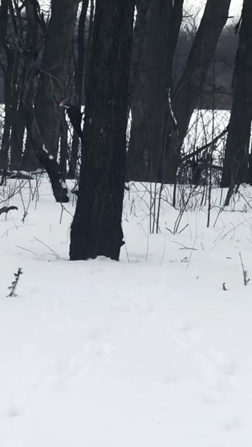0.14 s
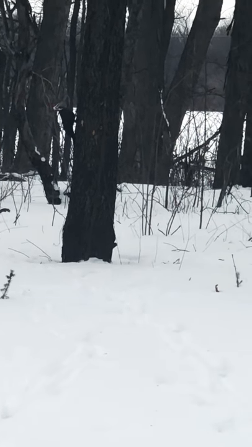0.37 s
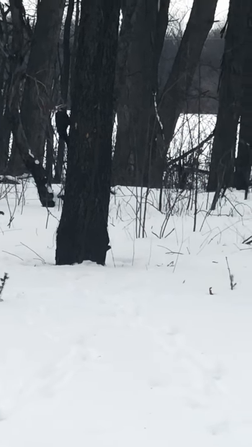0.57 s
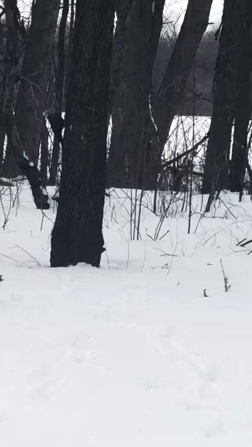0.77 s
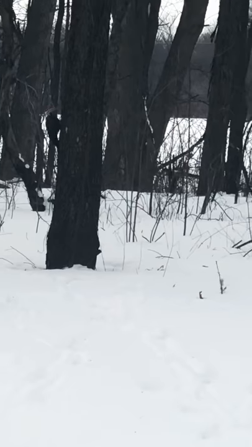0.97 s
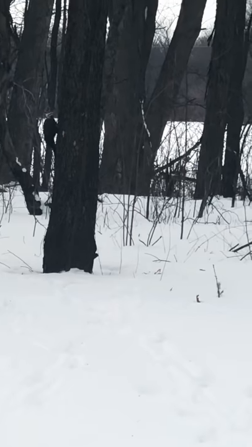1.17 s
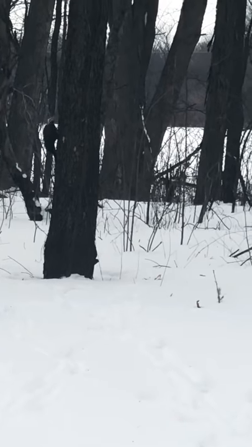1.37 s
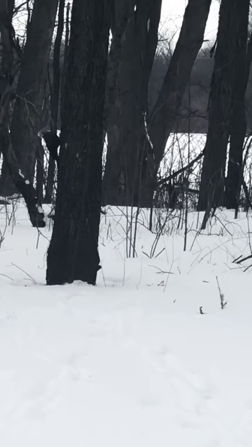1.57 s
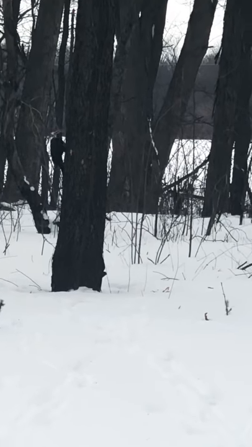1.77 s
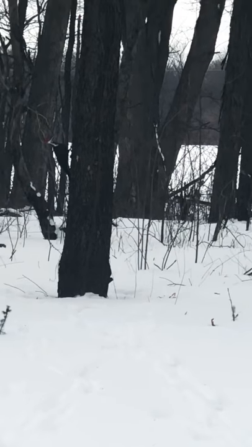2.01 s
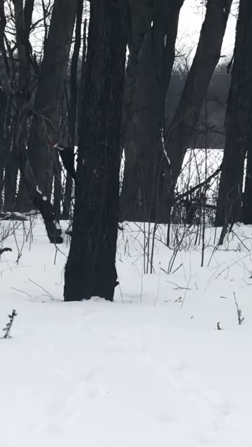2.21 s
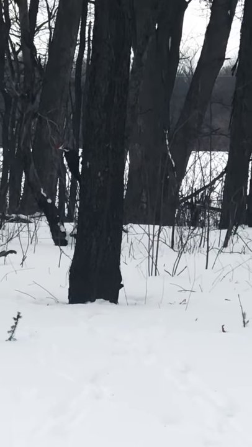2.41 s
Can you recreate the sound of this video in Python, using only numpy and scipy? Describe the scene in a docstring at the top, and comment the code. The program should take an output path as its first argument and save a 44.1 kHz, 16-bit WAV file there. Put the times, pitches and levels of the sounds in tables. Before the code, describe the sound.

A woodpecker knocks slowly on a tree trunk, five spaced hollow taps in quiet snowy woods

```python
"""Woodpecker in a snowy wood

In a quiet wood a woodpecker knocks five times on a trunk: noise clicks over damped modes, with ticks of bark.
A small bird gives two thin, arched chirps, sines with an octave, that hang among the trees as scattered echoes.
Soft bumps of sinking pitch sound close to the microphone, some with a dull, ringing contact.
Behind lie a far rumble with deep sine throbs, a faint hiss and a wavering whir, all of filtered noise."""
import sys
import numpy as np
from scipy import signal
from scipy.fft import rfft, irfft
from scipy.io import wavfile
from scipy.ndimage import uniform_filter1d

SR = 44100
rng = np.random.default_rng(int(sys.argv[2]) if len(sys.argv) > 2 else 0)


def generate_wav(signal):
    """Clip the signal to [-1, 1] and save it as 16-bit WAV at the path in sys.argv[1]."""
    frames = np.transpose(np.atleast_2d(signal))
    scaled = np.clip(frames, -1, 1) * 32767
    pcm = np.round(scaled).astype(np.int16)
    wavfile.write(sys.argv[1], SR, pcm)


N = 108045  # length in samples


def amp(db):
    """Decibels to gain."""
    return 10 ** (np.asarray(db) / 20)


def unit(x):
    """Scales to rms 1."""
    return x / np.sqrt(np.mean(x ** 2) + 1e-20)


def read(points, hz):
    """Reads a table of values against frequency on a log-frequency axis."""
    freq_hz, value = np.transpose(points)
    return np.interp(np.log(hz + 1), np.log(freq_hz + 1), value)


def add(mix, start_s, sound):
    """Mixes a sound in at its start time."""
    part = mix[max(round(start_s * SR), 0):][:len(sound)]
    part += sound[:len(part)]


def drift(n, size):
    """Smooth random wander of rms 1; size is the smoothing in samples."""
    once = uniform_filter1d(rng.standard_normal(n), size)
    return unit(uniform_filter1d(once, size))


def burst(spectrum, t60_s):
    """A short crack: dying noise coloured by a causal filter, so that nothing sounds ahead of it."""
    t = np.arange(4096) / SR
    hz = abs(np.fft.fftfreq(len(t), 1 / SR))
    log_gain = np.log(amp(read(spectrum, hz)))
    # minimum phase, found from the log gain
    response = np.exp(np.conj(signal.hilbert(log_gain)))
    colour = np.fft.ifft(response).real[:1024]
    fade = amp(-60 * t / t60_s)
    crack = signal.fftconvolve(rng.standard_normal(len(t)) * fade, colour)[:len(t)]
    return unit(crack) * np.sqrt(np.mean(fade ** 2))


def air(spectrum, patch_db, size):
    """Coloured noise whose level drifts in patches of time and frequency."""
    hz = np.fft.rfftfreq(size, 1 / SR)
    real, imag, rough = rng.standard_normal((4 * N // size + 6, len(hz), 3)).T
    patches = uniform_filter1d(rough, size=7, axis=0)
    patches = unit(uniform_filter1d(patches, size=5, axis=1))
    z = (real + 1j * imag) * amp(read(spectrum, hz)[:, None] + patch_db * patches)
    noise = signal.istft(z, nperseg=size, noverlap=size - size // 4)[1]
    return unit(noise[:N])


def ring(modes, rise_s, tuning=1):
    """Damped modes; neighbours swing in opposite directions, so the knock swells over a cycle or two."""
    t = np.arange(4096) / SR
    swings = np.zeros(len(t))
    for k, (hz, db, t60_s) in enumerate(modes):
        swings += (-1) ** k * amp(db - 60 * t / t60_s) * np.sin(2 * np.pi * tuning * hz * t)
    return (1 - np.exp(-t / rise_s)) ** 2 * swings


# far rumble, relative spectrum: freq_hz, density_db
RUMBLE_SPECTRUM = [(20, -56), (34, -34), (48, -13), (66, 2), (82, 0.5), (100, -7), (170, -5), (250, -12.5),
                   (400, -15.5), (600, -23.5), (950, -28), (1170, -28), (1380, -31), (1900, -34),
                   (2800, -47), (8000, -70)]
# slow course of the rumble: time_s, level_db
RUMBLE_SWELL = [(0, -1), (.2, 1), (.55, -1), (.8, 1), (1.05, 2), (1.3, 1), (1.7, 0.5), (1.95, 1.5),
                (2.17, 1.5), (2.45, 0.5)]
# faint hiss, relative spectrum: freq_hz, density_db
HISS_SPECTRUM = [(20, 6), (2000, 3), (3500, 3), (5000, 0), (8250, -2.5), (8700, 2), (9150, -4), (12500, -4),
                 (14000, -6), (16000, -12.5)]
RUMBLE_DB, RUMBLE_PATCH_DB = -53.5, 2.5
HISS_DB, HISS_PATCH_DB = -74, 1
WHIR_HZ, WHIR_WIDTH_HZ, WHIR_DB, WHIR_WAVER_DB = 1596, 182, -71.5, 1.5


def background():
    """Far rumble, even hiss and a faint wavering whir: noise through broad spectra and one narrow band."""
    swell = amp(np.interp(np.arange(N) / SR, *np.transpose(RUMBLE_SWELL)))
    rumble = amp(RUMBLE_DB) * swell * air(RUMBLE_SPECTRUM, RUMBLE_PATCH_DB, size=4096)
    hiss = amp(HISS_DB) * air(HISS_SPECTRUM, HISS_PATCH_DB, size=512)
    hz = np.fft.rfftfreq(N, 1 / SR)
    band = 1 / (1 + ((hz - WHIR_HZ) / (WHIR_WIDTH_HZ / 2)) ** 2)
    whir = unit(irfft(rfft(rng.standard_normal(N)) * band, N))
    whir *= amp(WHIR_DB + WHIR_WAVER_DB * drift(N, size=3000))
    return rumble + hiss + whir


# low bumps close to the microphone: start_s, level_db, start_pitch_hz, length_s, rise_s
CLOSE_BUMPS = [(0.2261, -30.1, 223, 0.035, 0.0036), (0.249, -15.5, 270, 0.024, 0.02),
               (.269, -25, 403, 0.04, 0.0023), (0.3108, -27, 630, 0.038, 0.014),
               (0.8703, -27.5, 495, 0.023, 0.015), (0.9305, -19.5, 600, 0.031, 0.016),
               (1.372, -42.5, 327, 0.016, 0.0033), (1.678, -36.5, 390, 0.033, .008),
               (2.099, -38.5, 390, .04, 0.0069)]
# dull contact at the harder bumps: start_s, level_db
BUMP_CONTACTS = [(0.2693, -35.5), (.3150, -32), (0.9307, -21.5)]
# what the contact rings with: pitch_hz, level_db, t60_s
CONTACT_MODES = [(368, -9.5, 0.027), (484, -14, 0.041), (622, -13, 0.021), (1170, -28, .018)]
BUMP_LOW_HZ, BUMP_SAG_S = 111.4, 0.0047  # pitch sinks toward this value, with this time constant
CONTACT_RISE_S = .0009


def bumps():
    """Soft, close thumps whose pitch sinks quickly; the harder ones have a dull contact of damped modes."""
    out = np.zeros(N)
    for start_s, db, pitch_hz, length_s, rise_s in CLOSE_BUMPS:
        t = np.arange(0, length_s, 1 / SR)
        hz = BUMP_LOW_HZ + (pitch_hz - BUMP_LOW_HZ) * np.exp(-t / BUMP_SAG_S)
        thump = np.sin(2 * np.pi * np.cumsum(hz) / SR)
        envelope = (1 - np.exp(-t / rise_s)) * np.cos(np.pi / 2 * t / length_s) ** 2
        add(out, start_s, amp(db) * thump * envelope)
    for start_s, db in BUMP_CONTACTS:
        add(out, start_s, amp(db) * ring(CONTACT_MODES, CONTACT_RISE_S))
    return out


# bill blows: start_s, level_db, deep_db, upper_db, high_db, click_db, tuning_ratio
# (deep, upper, high and click are relative to the blow; tuning belongs to the spot struck)
BLOWS = [(.5688, -40.6, -2, 6.5, -4, 4, 1.008), (1.0105, -37.5, 0.3, 1, -7, -5, 1.002),
         (1.2784, -38, 3.5, 1.5, 2, -1, 1.003), (1.5394, -42, 6.5, -17, 7, 2, .998),
         (1.8103, -38.6, -3, 5, -7, 3, 1.02)]
# trunk modes in four groups: pitch_hz, level_db, t60_s
DEEP_MODES = [(645, -3, 0.014), (854, -17, 0.034)]
MAIN_MODES = [(1152, 2, .033)]
UPPER_MODES = [(1313, 0.2, 0.012), (1470, -9.5, 0.019)]
HIGH_MODES = [(2237, -4.5, 0.013), (2785, -15.5, 0.011), (3750, -4, 0.0046)]
# click of the bill, relative spectrum: freq_hz, density_db
CLICK_SPECTRUM = [(500, -16), (2000, -1.5), (3500, 2.5), (4700, -4.5), (6200, 3), (7500, 1.5), (9000, -3.5),
                  (12500, -1), (14000, -11), (16000, -9)]
# small ticks of bark: start_s, level_db
BARK_TICKS = [(.5024, -61.5), (0.7835, -56), (1.7545, -64), (1.8308, -55.5)]
# colour of a bark tick, relative spectrum: freq_hz, density_db
TICK_SPECTRUM = [(1000, -0.5), (3000, -7.5), (4200, -0.5), (5100, -10.5), (7000, -9), (8500, -21),
                 (16000, -30)]
RING_DELAY_S, RING_RISE_S, HIGH_RISE_S = 0.00039, 0.00018, 0.0017
CLICK_DB, CLICK_T60_S, TICK_T60_S = -14.5, 0.0068, 0.011


def woodpecker():
    """The bill clicks on the bark and the trunk rings; each spot favours other modes."""
    out = np.zeros(N)
    for start_s, db, deep_db, upper_db, high_db, click_db, tuning in BLOWS:
        click = burst(CLICK_SPECTRUM, CLICK_T60_S)
        add(out, start_s, amp(db + click_db + CLICK_DB) * click)
        wood = ring(MAIN_MODES, RING_RISE_S, tuning)
        wood += amp(deep_db) * ring(DEEP_MODES, RING_RISE_S, tuning)
        wood -= amp(upper_db) * ring(UPPER_MODES, RING_RISE_S, tuning)
        wood += amp(high_db) * ring(HIGH_MODES, HIGH_RISE_S, tuning)
        add(out, start_s + RING_DELAY_S, amp(db) * wood)
    for start_s, db in BARK_TICKS:
        add(out, start_s, amp(db) * burst(TICK_SPECTRUM, TICK_T60_S))
    return out


# how long the scattering hangs among the trees: freq_hz, t60_s
TREE_DECAY = [(200, 0.35), (1200, 0.59), (7000, 0.58), (16000, 0.17)]


def trees(x):
    """Scattered echoes from the trunks, each band dying at its own speed."""
    # about 2000 echoes a second, none in the first 300 samples
    hits = (rng.random(SR) < 2000 / SR) * (np.arange(SR) > 300)
    taps = rng.standard_normal(SR) * hits
    hz, t, z = signal.stft(taps, SR, nperseg=256)
    fade = amp(-60 * t / read(TREE_DECAY, hz)[:, None])
    tail = signal.istft(z * fade, SR, nperseg=256)[1]
    return signal.fftconvolve(x, tail / np.linalg.norm(tail))[:N]


# course of each chirp: time_s, pitch_hz, level_db, octave_db (relative to the whistle)
CHIRP_COURSES = [
    [(.804, 7230, -82, -18), (.813, 7520, -67, -22), (.823, 7640, -62, -22), (.845, 7630, -65.5, -17),
     (.865, 7320, -61, -18), (.873, 6780, -69, -20), (.878, 5200, -88, -8)],
    [(.942, 5770, -77, -22), (.950, 6450, -65, -26), (.960, 6670, -60.5, -26), (.976, 6680, -58, -30),
     (.984, 5920, -65, -20), (.993, 4960, -72, -6), (1.006, 3600, -97, 16)],
]
CHIRP_JITTER, CHIRP_FLUTTER_DB = .003, 2  # rms wander of pitch (ratio) and of level


def small_bird():
    """Nearly pure whistles that rise, crest and plunge; the octave comes out as they fall."""
    out = np.zeros(N)
    for course in CHIRP_COURSES:
        time_s, pitch_hz, level_db, octave_db = np.transpose(course)
        t = np.arange(time_s[0], time_s[-1], 1 / SR)
        hz = uniform_filter1d(np.interp(t, time_s, pitch_hz), size=160)
        hz *= 1 + CHIRP_JITTER * drift(N, size=40)[:len(t)]
        phase = 2 * np.pi * np.cumsum(hz) / SR
        flutter_db = CHIRP_FLUTTER_DB * drift(N, size=200)[:len(t)]
        level = amp(np.interp(t, time_s, level_db) + flutter_db)
        octave = amp(np.interp(t, time_s, octave_db)) * np.sin(2 * phase)
        add(out, time_s[0], level * (np.sin(phase) + octave))
    return out


# deep, faint throbs in the rumble: start_s, length_s, level_db
RUMBLE_THROBS = [(1.17, 0.057, -47.5), (1.402, 0.052, -44), (1.593, 0.085, -45), (2.126, 0.13, -44.5)]
THROB_HZ = 75  # mean pitch


def throbs():
    """Deep sines of unsteady pitch that swell and fade within the rumble."""
    out = np.zeros(N)
    for start_s, length_s, db in RUMBLE_THROBS:
        t = np.arange(0, length_s, 1 / SR)
        hz = THROB_HZ * (1 + .12 * drift(N, size=400)[:len(t)])
        tone = np.sin(2 * np.pi * np.cumsum(hz) / SR)
        add(out, start_s, amp(db) * np.sin(np.pi * t / length_s) * tone)
    return out


PECK_ECHO_DB, CHIRP_ECHO_DB = -22, -12.5


def scene():
    """Both birds with their echoes, the near bumps and the still wood."""
    pecks, chirps = woodpecker(), small_bird()
    echo = trees(amp(PECK_ECHO_DB) * pecks + amp(CHIRP_ECHO_DB) * chirps)
    mix = background() + bumps() + pecks + chirps + echo + throbs()
    return mix[None]  # one channel


EDGE_HZ = 15900


def record(dry):
    """The recorder's band limit: a steep low-pass filter."""
    lowpass = signal.firwin(511, EDGE_HZ, window=("kaiser", 9), fs=SR)
    return signal.oaconvolve(dry, lowpass[None], "same")


dry = scene()
out = record(dry)
generate_wav(out)
```